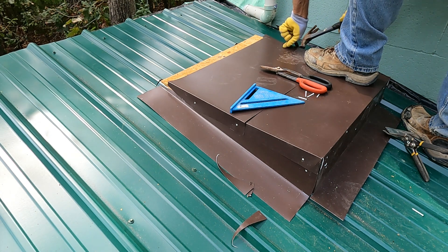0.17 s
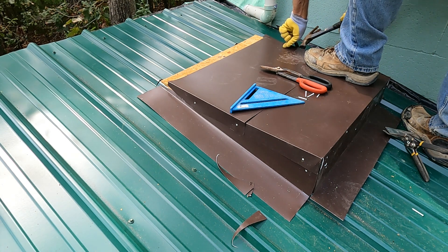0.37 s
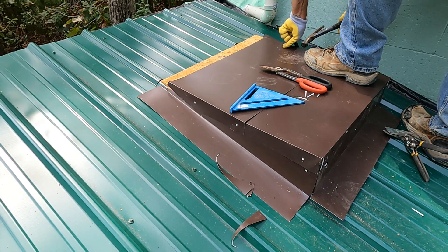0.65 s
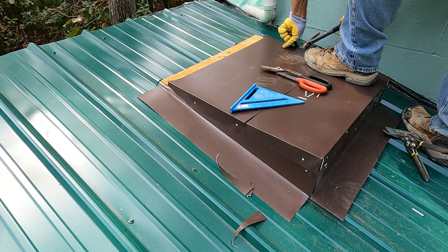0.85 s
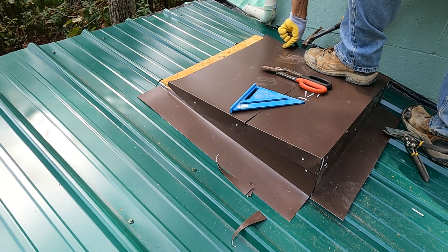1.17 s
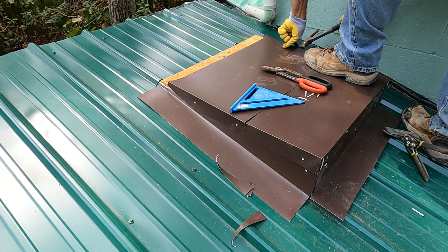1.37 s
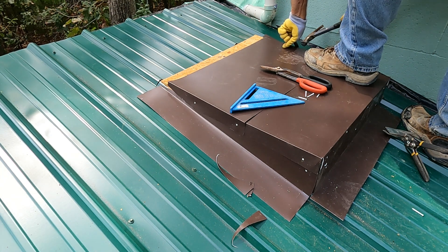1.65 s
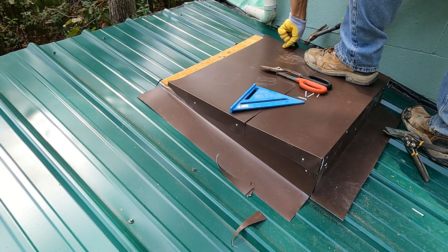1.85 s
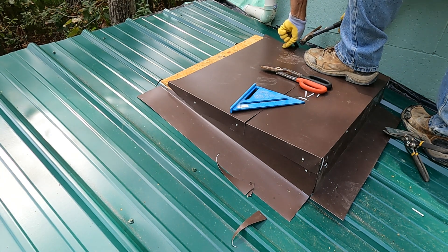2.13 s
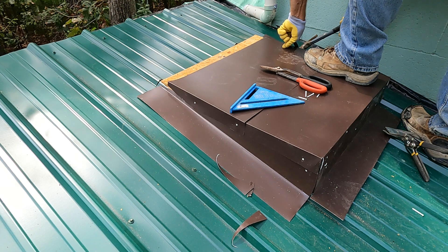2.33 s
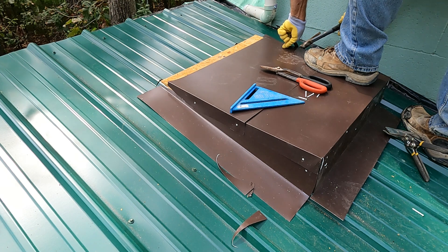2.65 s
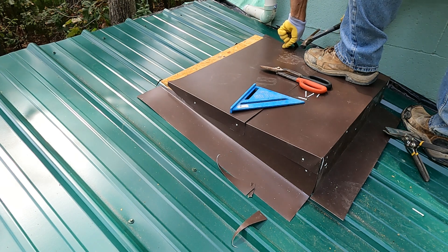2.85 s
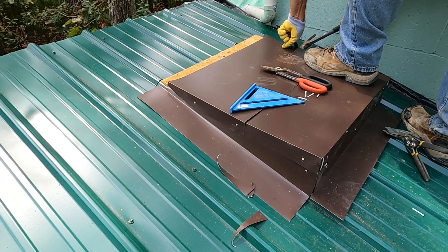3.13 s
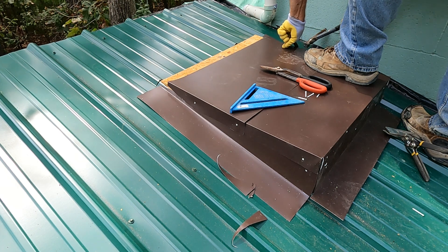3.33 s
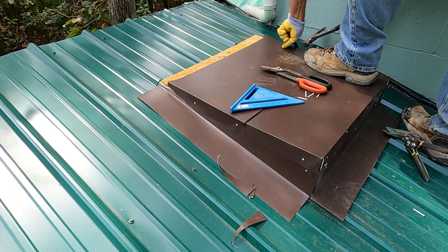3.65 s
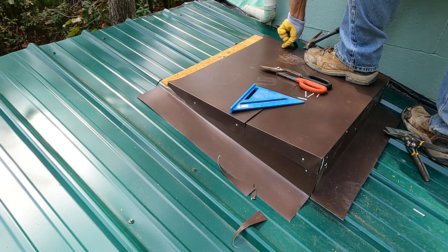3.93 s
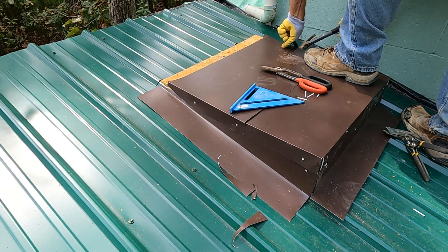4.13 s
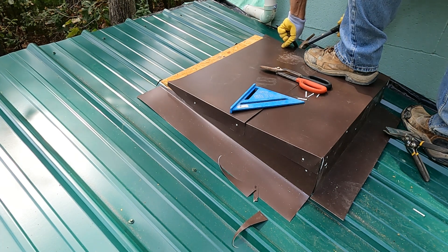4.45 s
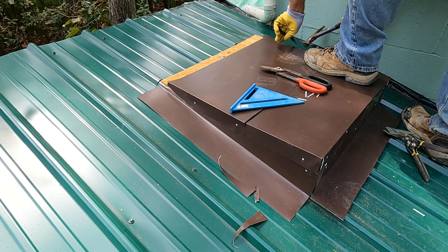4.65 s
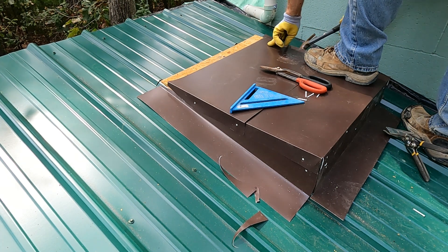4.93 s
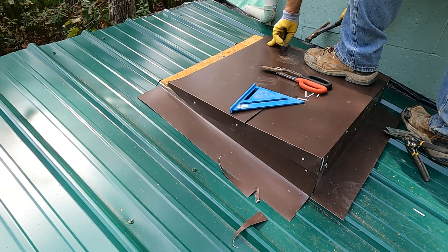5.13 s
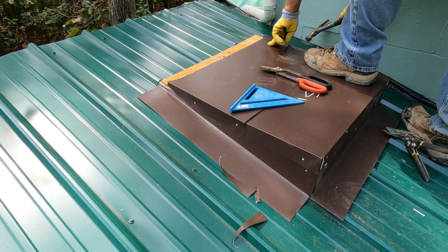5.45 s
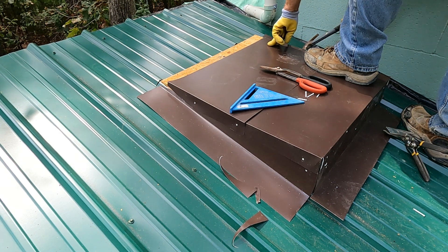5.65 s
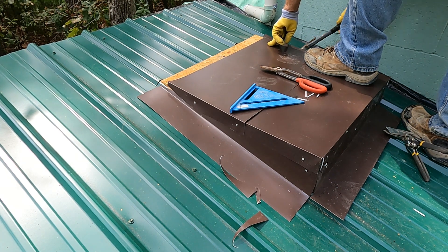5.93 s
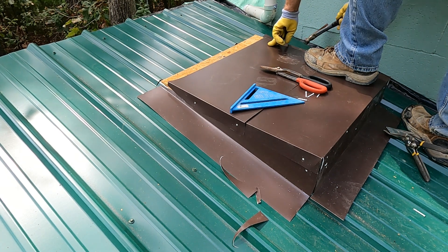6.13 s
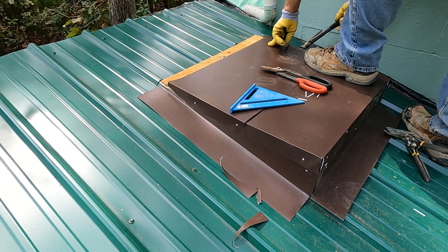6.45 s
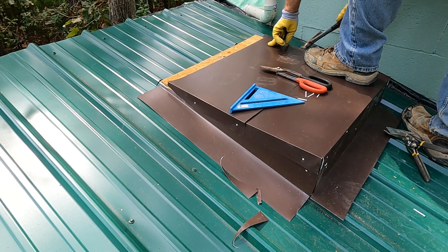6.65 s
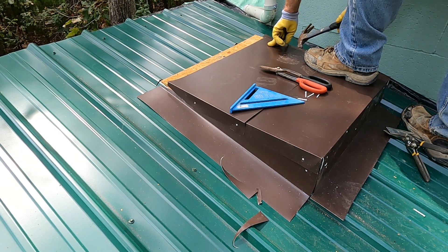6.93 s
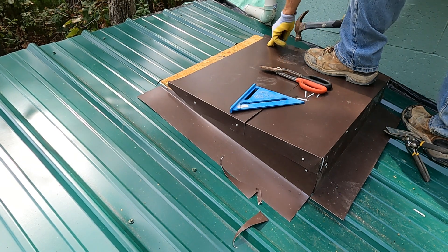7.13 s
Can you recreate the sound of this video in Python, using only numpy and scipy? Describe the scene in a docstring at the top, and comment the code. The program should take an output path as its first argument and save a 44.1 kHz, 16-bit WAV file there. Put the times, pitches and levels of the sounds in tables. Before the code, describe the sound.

A hammer works on sheet-metal flashing on a ribbed metal roof outdoors, heard in stereo from a few steps away, slightly right of centre. Faint breeze, leaves and insects lie behind. Two light taps fall at 0.2 and 0.6 seconds, a sharper clank with a quick bounce at 0.9, and a medium one with a bounce at 1.6. From 2.1 seconds hard blows follow steadily, every 0.3 to 0.4 seconds, until 6.8. Each is a dry crack with a short tinny ring, a hollow box thump and a low roof boom, trailing a hissing shimmer of about half a second. Loose steel tools chatter briefly after most hits, with small ticks between. A short scrape rasps at about 4.7 seconds. From about 5.3 the blows sound brighter; the final pair at 6.6 and 6.8 is quicker, the last softer and duller, ringing away into quiet by 7.3.

```python
"""A claw hammer strikes sheet-metal flashing on a ribbed metal roof, outdoors, a few steps from two microphones.
Each blow is a burst of crack noise, then damped modes: the hammer pings, sheet and hollow box ring, the roof booms.
Decaying noise is the hissing shimmer. Short bursts are hammer bounces, sheet ticks and tool clicks; trains of tiny
impacts through resonances are loose steel tools chattering and the hammer scraping. Coloured noise is the woodland."""
import sys
import numpy as np
from scipy import signal
from scipy.fft import rfft, irfft, next_fast_len
from scipy.io import wavfile
from scipy.ndimage import uniform_filter1d

SR = 44100
rng = np.random.default_rng(int(sys.argv[2]) if len(sys.argv) > 2 else 0)


def bounce(signal):
    """Save signal as a 16-bit WAV file at the path given by the first command-line argument."""
    frames = np.transpose(np.atleast_2d(signal))
    limited = np.clip(frames, -1, 1)
    pcm = np.round(limited * 32767).astype(np.int16)
    wavfile.write(sys.argv[1], SR, pcm)


N = 321048

# Hollow box modes. Each row: frequency in Hz, relative level in dB, t60 in s, sign of the first swing.
BODY_MODES = [(263.7, -3.5, 0.15, 1), (328, 1.5, 0.11, -1), (376, 8.5, 0.077, 1), (390.6, -6, 0.26, -1),
              (418.7, 2.5, 0.095, 1), (456.6, -2.5, 0.093, -1)]
# Flashing sheet modes. Each row: frequency in Hz, relative level in dB, t60 in s, sign of the first swing.
SHEET_MODES = [(554, -8.5, 0.23, 1), (630, -12.5, 0.17, -1), (705, -2.5, 0.1, 1), (783, 6, 0.07, -1),
               (889, 4, 0.042, 1), (967, 4, 0.11, -1), (1031, -1.5, 0.12, 1), (1218, -4.5, 0.037, -1),
               (1268, 1, 0.098, 1), (1445, 13, 0.038, -1), (1614, 12.5, 0.044, 1), (1910, 4.5, 0.052, -1)]


def amp(db):
    """Amplitude factor of a level in dB."""
    return 10 ** (np.asarray(db) / 20)


def unit(x):
    """x scaled to rms 1."""
    return x / np.sqrt(np.mean(x ** 2) + 1e-20)


def along(points, hz):
    """Interpolates (Hz, value) points on a log frequency axis."""
    f, v = np.transpose(points)
    return np.interp(np.log(hz + 1), np.log(f + 1), v)


def filtered(x, response):
    """x times a complex response of frequency."""
    m = next_fast_len(x.shape[-1] + 8192)
    spectrum = rfft(x, m) * response(np.fft.rfftfreq(m, 1 / SR))
    return irfft(spectrum, m)[..., :x.shape[-1]]


def add(track, s, sound):
    """Mixes a sound in at time s."""
    part = track[..., round(s * SR):][..., :sound.shape[-1]]
    part += sound[..., :part.shape[-1]]


def creep(s, start_db, db_per_s):
    """A level that drifts evenly with time as the hammer works along the fold."""
    return start_db + db_per_s * s


def favoured(modes, spot_hz, db_per_octave):
    """The struck spot favours the modes near one pitch."""
    return [(hz, db - db_per_octave * abs(np.log2(hz / spot_hz)), t60, way) for hz, db, t60, way in modes]


def ring(modes, t, scatter_db):
    """Damped modes: decaying sines, with strengths drawn anew at every call."""
    total = 0
    for hz, db, t60, way in modes:
        decay = amp(db + scatter_db * rng.normal() - 60 * t / t60)
        total = total + np.sign(way) * decay * np.sin(2 * np.pi * hz * t)
    return total


def burst(colour_db, t60, rise_s, count, channels=1):
    """Noise of many dense plate modes: rms 1 before the rise and decay, every band dying at its own speed."""
    noise = unit(filtered(rng.standard_normal((channels, count)), lambda hz: amp(colour_db(hz))))
    hz, t, z = signal.stft(noise, SR, nperseg=128)
    decay = amp(-60 * t / along(t60, hz)[:, None])
    dying = signal.istft(z * decay, SR, nperseg=128)[1][:, :count]
    return dying * (1 - np.exp(-(np.arange(count) / SR / rise_s) ** 2))


def contacts(length_s, rate_hz):
    """Random tiny impacts, uneven in clumps of 200 samples, under a swell; silence is left for the ringing."""
    count = round(length_s * SR)
    clumps = amp(2.5 * np.repeat(rng.standard_normal(SR // 800), 200))
    impacts = rng.standard_normal(SR // 4) * (rng.random(SR // 4) < rate_hz / SR)
    hits = impacts[:len(clumps)] * clumps
    return np.pad(hits[:count] * np.hanning(count) ** .25, (0, 3000))


def woods():
    """Far leaves, insects and breeze: noise with faint patches, partly alike left and right."""
    # Each row: frequency in Hz, relative density in dB per Hz.
    woods_colour = [(15, -2), (35, 2), (60, 4.5), (90, -9), (160, -9.5), (300, -13.5), (450, -21),
                    (750, -27.5), (1200, -21), (2500, -26), (6000, -30), (8200, -38.5), (12000, -43),
                    (16000, -50.5)]
    # Each row: time in s, rms level in dB.
    woods_level = [(0, -50.5), (2, -51), (2.9, -53.5), (5, -53.5), (7.28, -54)]
    # Each row: frequency in Hz, left-right correlation.
    likeness = [(60, 0.88), (240, 0.84), (950, 0.42), (3770, 0.59), (15000, 0.42)]
    z = signal.stft(rng.standard_normal((2, N)), nperseg=512)[2]
    patches = uniform_filter1d(uniform_filter1d(rng.standard_normal(z.shape[1:]), 6, 0), 14, 1)
    pair = signal.istft(z * amp(0.54 * unit(patches)), nperseg=512)[1][:, :N]

    def mid_side(hz):
        turn = np.arccos(np.clip(along(likeness, hz), -1, 1)) / 2
        return amp(along(woods_colour, hz)) * [np.cos(turn), np.sin(turn)]

    mid, side = filtered(pair, mid_side)
    s, db = np.transpose(woods_level)
    return amp(np.interp(np.arange(N) / SR, s, db)) * unit(np.array([mid + side, mid - side]))


def crack(near, wide, s, db, bite_db):
    """Impact noise in the air: a fast snap, its scattered part in antiphase left and right, and a slower tail."""
    # Each row: frequency in Hz, relative level in dB.
    crack_colour = [(150, -3), (350, -1.5), (800, -1.5), (1600, -7.5), (3000, -5), (5000, -2), (7500, 0),
                    (9000, -5), (12500, -7), (16000, -46)]
    # Tail decay. Each row: frequency in Hz, t60 in s.
    crack_t60 = [(300, 0.17), (800, 0.19), (2000, 0.11), (5000, 0.081), (12000, 0.078)]
    # Scattered part. Each row: frequency in Hz, gain in dB.
    scatter_gain = [(300, -29), (2000, -9.5), (8000, -9.5), (13000, -12)]
    tail_db = -15.5
    clank_db = creep(s, start_db=-14, db_per_s=1.92)
    sizzle_db = -16 + bite_db
    top_db = -22 + 0.75 * db  # harder blows reach higher
    tilt = [(700, clank_db), (1900, 0), (4600, bite_db), (9500, sizzle_db), (13500, top_db)]
    colour = lambda hz: along(crack_colour, hz) + along(tilt, hz)
    snap, scattered = burst(colour, [(1000, 0.028), (10000, 0.023)], rise_s=0.0033, count=4000, channels=2)
    add(near, s, amp(db) * snap)
    add(wide, s, amp(db) * filtered(scattered, lambda hz: amp(along(scatter_gain, hz))) * [[1], [-1]])
    add(near, s, amp(db + tail_db) * burst(colour, crack_t60, rise_s=0.0011, count=9000)[0])


def shimmer(wide, s, box_db):
    """Hiss of the whole roof's dense modes, from both sides; it grows with the thump."""
    # Each row: frequency in Hz, relative density in dB per Hz.
    shimmer_colour = [(200, 0.5), (350, -8.5), (700, -10), (1100, -10), (2000, -16.5), (4800, -19),
                      (7500, -24), (10800, -36.5), (15500, -47)]
    # Each row: frequency in Hz, t60 in s.
    shimmer_t60 = [(300, 0.41), (1000, 0.52), (4000, 0.55), (10000, 0.32)]
    shimmer_db = -23.5 + 0.42 * box_db
    colour = lambda hz: along(shimmer_colour, hz)
    alike, apart = burst(colour, shimmer_t60, rise_s=0.012, count=SR // 2, channels=2)
    add(wide, s, amp(shimmer_db) * (alike + 0.45 * apart * [[1], [-1]]))


def sheet_ring(near, s, t, sheet_db, edge_db, spot_hz):
    """Bending modes of sheet, loose edge and hollow box swell up in turn, then die away."""
    # Loose edge. Each row: frequency in Hz, relative level in dB, t60 in s, sign of the first swing.
    edge_modes = [(600, -17.5, 0.23, 1), (640, -20.5, 0.17, -1), (892, -9, 0.22, 1), (977, -7.5, 0.25, 1),
                  (1059, -2.5, 0.19, -1), (1137, -2, 0.28, 1), (1192, -11.5, 0.25, 1),
                  (1265, -13, 0.28, -1), (1776, -16, .25, 1)]
    swell = 1 - np.exp(-t / 0.00073)
    sheet = ring(favoured(SHEET_MODES, spot_hz, db_per_octave=13), t, scatter_db=2.0)
    add(near, s + 0.001006, swell * amp(sheet_db) * sheet)
    add(near, s + 0.0011, swell * amp(edge_db) * ring(edge_modes, t, scatter_db=0.5))
    body_db = sheet_db + creep(s, start_db=-22, db_per_s=3)
    add(near, s + 0.0031, swell * amp(body_db) * ring(BODY_MODES, t, scatter_db=2))


def ping(near, s, t, ping_hz):
    """Short high modes of the hammer head and fold."""
    # Each row: frequency in Hz, relative level in dB, t60 in s, sign of the first swing.
    ping_modes = [(2046, -3.5, 0.065, 1), (2485, -3, 0.087, -1), (2550, -5, 0.078, 1), (2670, -6, .13, -1),
                  (3624, 7, 0.037, -1), (4096, 7, 0.035, 1), (4190, -9.5, 0.087, -1), (4320, -23, 0.11, 1),
                  (4420, -12.5, 0.034, -1), (5330, 18, 0.029, 1)]
    ping_db = -24
    modes = favoured(ping_modes, ping_hz, db_per_octave=47)
    add(near, s + 0.001754, amp(ping_db) * ring(modes, t, scatter_db=5.5))


def thump(near, s, t, box_db, lid_db):
    """The sheet is first pushed down; then roof panels, covered box, its lid and a flap swing slowly."""
    # Each row of the four: frequency in Hz, relative level in dB, t60 in s, sign of the first swing.
    roof_modes = [(34.64, 4, 0.58, -1), (42.16, -2.5, 0.88, 1), (53.24, -4, 0.86, 1)]
    box_modes = [(70.85, -5, 0.52, 1), (77, 3, 0.2, -1), (94.75, -13, 0.68, 1), (109.63, 1.5, 0.33, 1)]
    lid_modes = [(124.8, 0, 0.17, 1), (145.4, -16, 0.31, 1), (198.7, -10, 0.18, 1), (242.7, -13.5, 0.11, 1)]
    flap_modes = [(156, -4, 0.36, -1), (171.3, -2.5, 0.34, 1), (230, -7.5, 0.32, 1)]
    push_db, push_s = box_db + lid_db + 0.5, 0.003
    add(near, s + 0.00401, -amp(push_db) * np.sin(np.pi * t[t < push_s] / push_s))
    roof_db = creep(s, start_db=-8, db_per_s=-1.1) + 0.55 * box_db
    flap_db = -30 + lid_db
    swing = amp(roof_db) * ring(roof_modes, t, scatter_db=.6)
    swing += amp(box_db) * ring(box_modes, t, scatter_db=1.2)
    swing += amp(box_db + lid_db) * ring(lid_modes, t, scatter_db=1.2)
    swing += amp(flap_db) * ring(flap_modes, t, scatter_db=1.5)
    add(near, s + 0.00705, swing)


def blows():
    """Crack in the air first; the slow bending waves set in a few milliseconds later."""
    # Each row: start in s, crack level in dB, bite (treble) over the crack in dB, thump into the box in dB,
    # lid over box in dB, sheet ring in dB, loose edge ring in dB, favoured sheet pitch in Hz, ping pitch in Hz.
    blow_rows = [(0.2142, -14.5, -15, -51, 0.5, -30, -50, 700, 3900),
                 (0.5681, -12, -16, -43.5, 0.5, -25.5, -36, 840, 2600),
                 (0.9256, -5, -13, -28, 1.5, -29, -22.5, 890, 2060),
                 (1.5806, -10, -13, -34, 2, -42, -30.5, 990, 2560),
                 (2.0704, -4, -5.5, -17.5, -2.5, -22, -34, 710, 2060),
                 (2.4451, -4.5, -8, -18, 2.5, -22.5, -33.5, 770, 2100),
                 (2.7911, -3, -10.5, -17, 0.5, -28.5, -30, 780, 3000),
                 (3.157, -4, -12, -16.5, 1.5, -24.5, -29.5, 1200, 2040),
                 (3.5306, -6, -12, -16.5, 1.5, -21.5, -32.5, 770, 2080),
                 (3.8627, -5.5, -9, -17.5, 4, -25.5, -42, 775, 1950),
                 (4.1962, -4, -6.5, -18.5, 5, -25.5, -30, 710, 1960),
                 (4.5176, -5, -10.5, -18.5, 5.5, -30, -30.5, 1430, 4020),
                 (4.9378, -4.5, -8.5, -18.5, 6.5, -28, -32, 945, 3900),
                 (5.2993, -4.5, -5, -18, 2, -24, -42, 970, 4120),
                 (5.648, -4.5, -3, -18, 2.5, -25, -45, 950, 4270),
                 (5.9912, -4.5, -5, -17.5, 1, -23.5, -36, 1020, 3940),
                 (6.3083, -3, -2.5, -16, 1, -35, -50, 1600, 4300),
                 (6.5991, -4.5, -7.5, -18, 4.5, -25.5, -36, 820, 4200),
                 (6.8393, -6.5, -12, -21.5, 4.5, -21, -46, 970, 2070)]
    near, wide, t = np.zeros(N), np.zeros((2, N)), np.arange(SR // 2) / SR
    for s, crack_db, bite_db, box_db, lid_db, sheet_db, edge_db, spot_hz, ping_hz in blow_rows:
        crack(near, wide, s, crack_db, bite_db)
        shimmer(wide, s, box_db)
        sheet_ring(near, s, t, sheet_db, edge_db, spot_hz)
        ping(near, s, t, ping_hz)
        thump(near, s, t, box_db, lid_db)
    return near, wide


def ticks():
    """Short clicks: mostly dull hammer bounces and sheet ticks, a few bright clicks of loose tools;
    each rings sheet and box a little."""
    # Each row: time in s, level in dB, treble tilt in dB.
    tick_rows = [(0.944, -20.5, -12), (1.594, -16, -7), (2.346, -45.5, -17), (2.366, -44.5, -19),
                 (2.408, -44.5, -19), (2.881, -48, 3), (3.087, -49.5, -21), (3.215, -34.5, -18),
                 (3.38, -47, -17), (3.452, -50.5, -16), (3.949, -38.5, 5), (4.228, -22.5, -26),
                 (4.559, -22.5, -21), (4.975, -21, -16), (5.332, -27.5, -26), (5.396, -43, -13),
                 (5.56, -50.5, -12), (5.679, -29.5, -28), (5.75, -46, -26.5), (6.019, -33, -36),
                 (6.408, -56, 7), (6.696, -45, 9.5), (6.905, -41, -21)]
    # Each row: frequency in Hz, relative level in dB.
    tick_colour = [(300, -13), (700, -1), (1200, -4), (2500, -9), (5000, -3), (9000, -22), (15000, -34)]
    track, t = np.zeros(N), np.arange(SR // 4) / SR
    for s, db, treble_db in tick_rows:
        colour = lambda hz: along(tick_colour, hz) + along([(2000, 0), (5000, treble_db)], hz)
        click = burst(colour, [(800, 0.073), (5000, 0.041)], rise_s=0.00092, count=5000)[0]
        add(track, s - .001, amp(db) * click)
        sheet_db = db - 21.5
        body_db = db + creep(s, start_db=-29.5, db_per_s=4.5)
        add(track, s, amp(sheet_db) * ring(SHEET_MODES, t, scatter_db=4.5))
        add(track, s, amp(body_db) * ring(BODY_MODES, t, scatter_db=2.5))
    return track


def tools():
    """Loose steel tools chatter on the box: tiny impacts excite steel resonances, without bass."""
    # Each row: start in s, length of the contacts in s, rms level in dB including the ringing.
    chatter_rows = [(2.494, 0.13, -70), (2.826, 0.083, -54), (2.948, 0.026, -63), (3.006, .015, -68),
                    (3.194, 0.087, -51), (3.559, .1, -54.5), (3.68, 0.011, -66), (3.905, 0.067, -47.5),
                    (4.246, 0.063, -52.5), (4.478, .012, -73), (4.579, 0.06, -50), (4.674, .015, -66),
                    (4.766, .014, -69), (4.988, 0.064, -53), (5.33, 0.065, -62), (5.684, 0.11, -54.5),
                    (6.026, 0.11, -57), (6.337, 0.14, -57.5), (6.646, 0.037, -54)]
    # Steel resonances. Each row: frequency in Hz, width in Hz, relative level in dB.
    steel_modes = [(3350, 89, 5.5), (4760, 98, 6), (4920, 48, 6.5), (6250, 100, 3.5), (7400, 74, -11),
                   (7700, 66, -7.5), (8980, 110, -7.5), (10500, 100, -10), (10600, 110, -23),
                   (11600, 100, -9)]
    track = np.zeros(N)
    for s, length_s, db in chatter_rows:
        gains = amp(rng.normal(0, 2, len(steel_modes)))

        def response(f):
            steel = 0
            for gain, (centre, width, level_db) in zip(gains, steel_modes):
                band = 1j * f * width
                steel = steel + gain * amp(level_db) * band / (centre * centre - f * f + band)
            # the many weak modes in between
            fizz = amp(-12.0) / (1 + (f / 8000) ** 5) / (1 + (3000 / (f + 1)) ** 3)
            return (steel + fizz) / (1 + (f / 12500) ** 8)

        add(track, s, amp(db) * unit(filtered(contacts(length_s, rate_hz=5000), response)))
    return track


def scrapes():
    """The hammer drags on the sheet: dense friction grains, coloured by the metal."""
    # Each row: start in s, length of the contacts in s, rms level in dB including the ringing, treble tilt in dB.
    scrape_rows = [(4.651, 0.029, -51.5, -17), (4.68, 0.054, -47.5, 1.5)]
    # Each row: frequency in Hz, relative level in dB.
    rasp_colour = [(500, 0), (800, -5), (1000, 8), (1400, -6), (2000, 3), (2400, -4), (2900, -1.5),
                   (4000, -12), (6000, -27), (12000, -52)]
    track = np.zeros(N)
    for s, length_s, db, treble_db in scrape_rows:
        colour = lambda hz: amp(along(rasp_colour, hz) + along([(1300, 0), (1900, treble_db)], hz))
        add(track, s, amp(db) * unit(filtered(contacts(length_s, rate_hz=4700), colour)))
    return track


def scene():
    """Places the work a little to the right by level and phase, over roof shimmer and woods."""
    # Each row: frequency in Hz, left over right in dB.
    lean = [(60, 1), (180, 0.5), (550, -1.5), (1650, -3), (4970, -2), (15000, 0.5)]
    # Each row: frequency in Hz, phase lead of the left in radians.
    lead = [(30, 0.026), (860, -0.37), (3270, -0.79), (6000, -0.45), (11000, -0.79)]
    ambience = woods()
    near, wide = blows()
    half = np.array([[.5], [-.5]])
    placing = lambda hz: amp(half * along(lean, hz)) * np.exp(1j * half * along(lead, hz))
    return filtered(near + ticks() + tools() + scrapes(), placing) + wide + ambience


def record(dry):
    """The input stage rounds off the highest peaks; then a sharp low-pass."""
    ceiling, knee, top_hz = 1, 5.6, 16000
    rounded = dry / (1 + np.abs(dry / ceiling) ** knee) ** (1 / knee)
    return filtered(rounded, lambda hz: hz < top_hz)


dry = scene()
out = record(dry)
bounce(out)
```